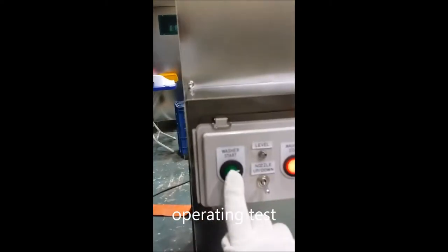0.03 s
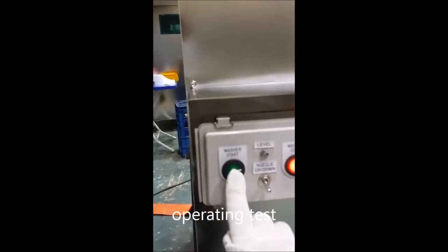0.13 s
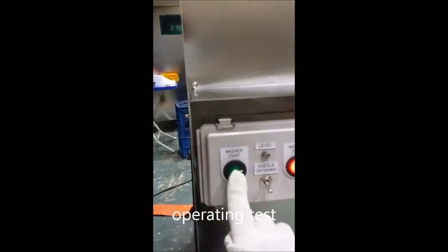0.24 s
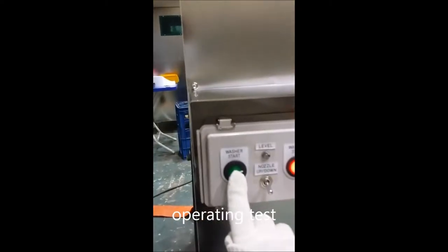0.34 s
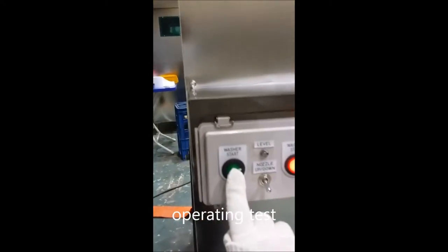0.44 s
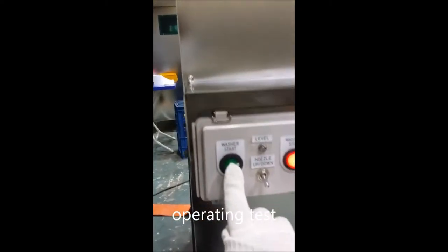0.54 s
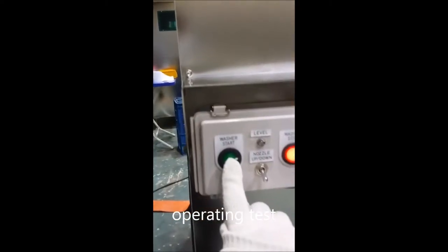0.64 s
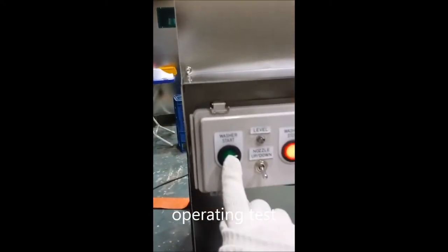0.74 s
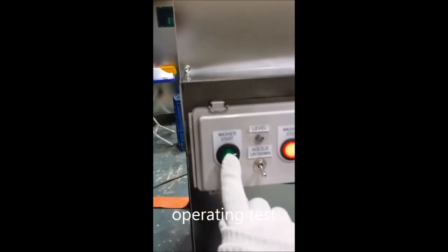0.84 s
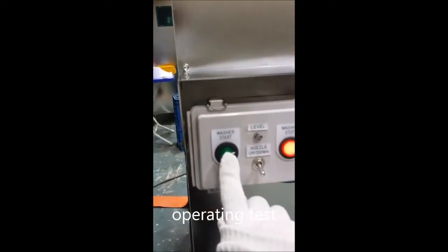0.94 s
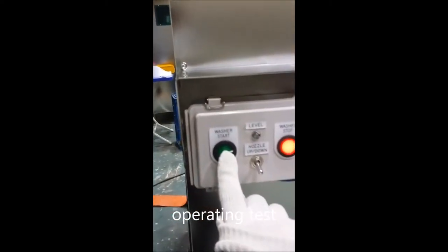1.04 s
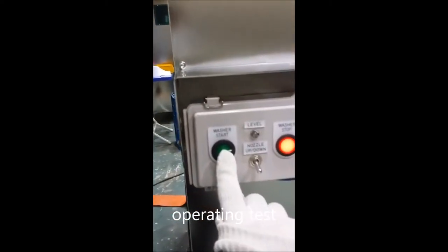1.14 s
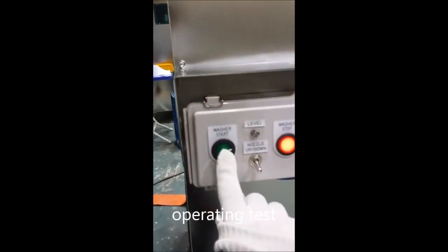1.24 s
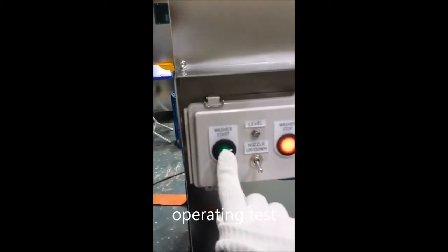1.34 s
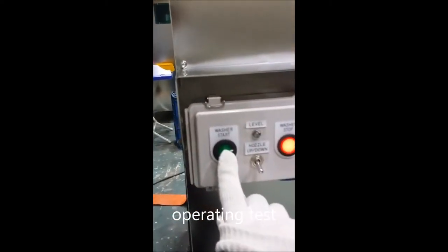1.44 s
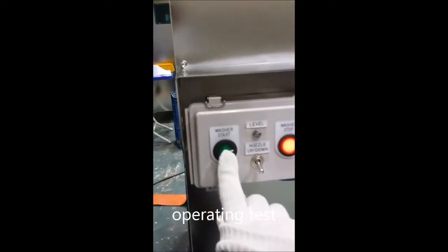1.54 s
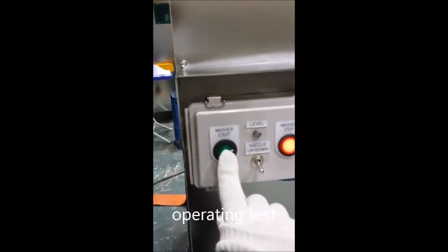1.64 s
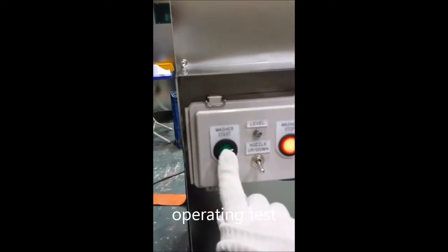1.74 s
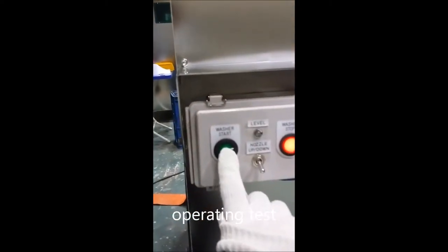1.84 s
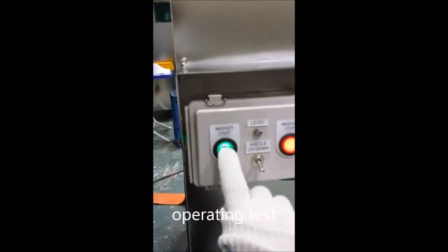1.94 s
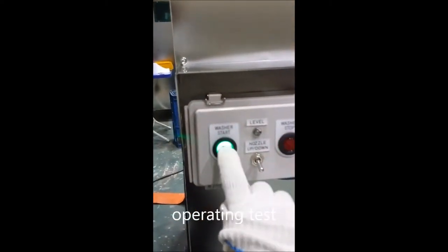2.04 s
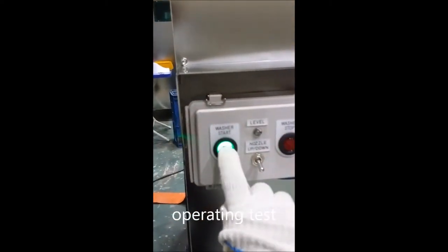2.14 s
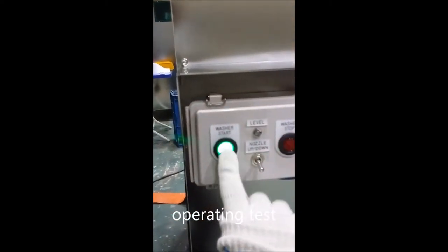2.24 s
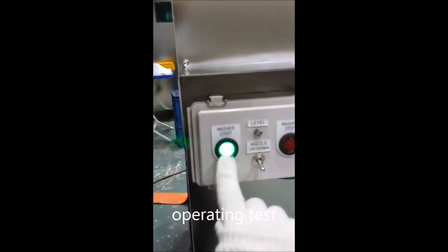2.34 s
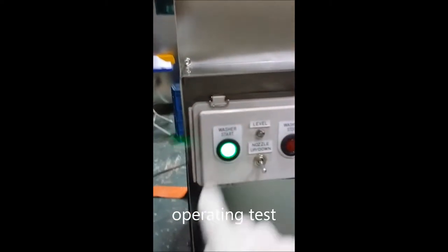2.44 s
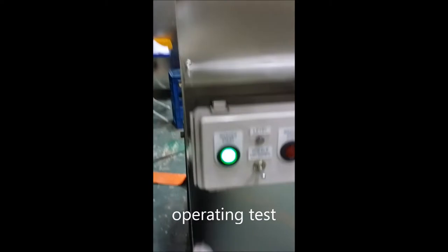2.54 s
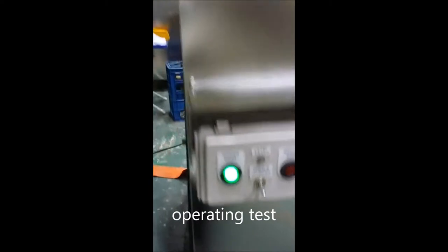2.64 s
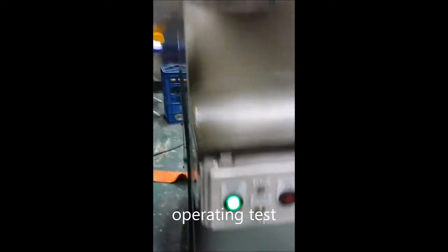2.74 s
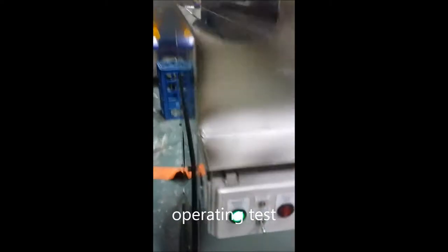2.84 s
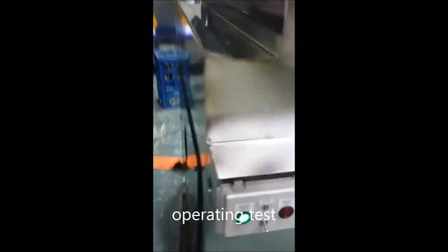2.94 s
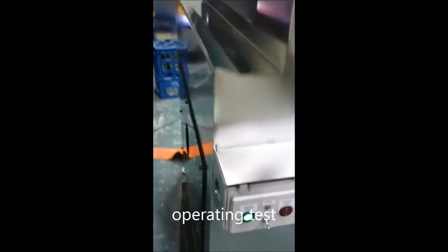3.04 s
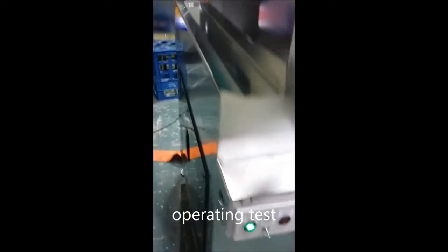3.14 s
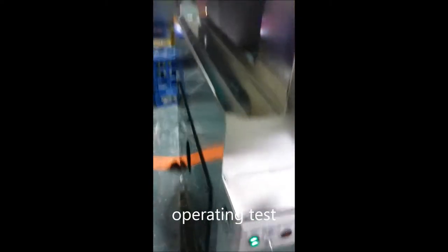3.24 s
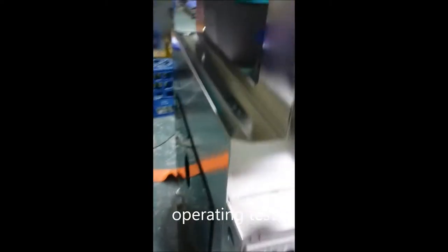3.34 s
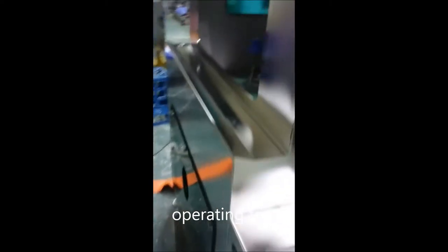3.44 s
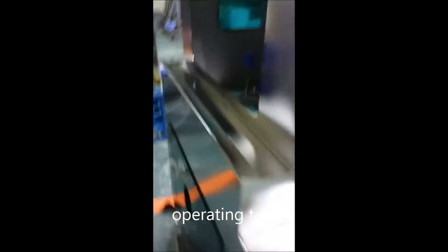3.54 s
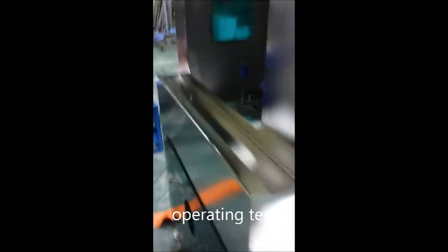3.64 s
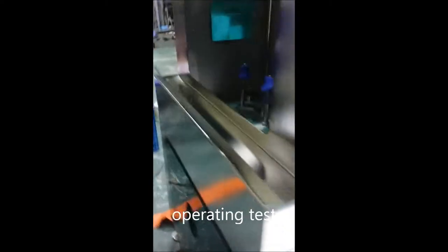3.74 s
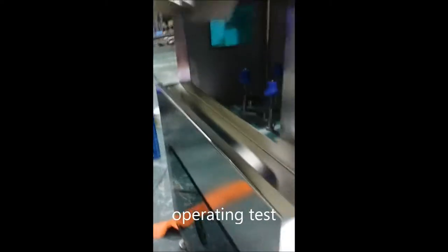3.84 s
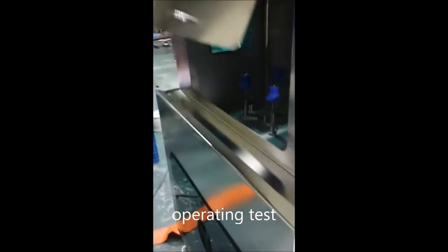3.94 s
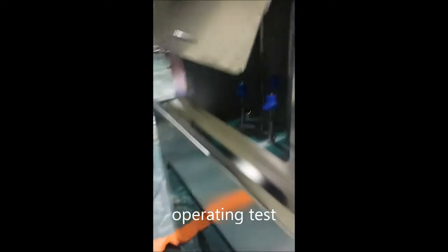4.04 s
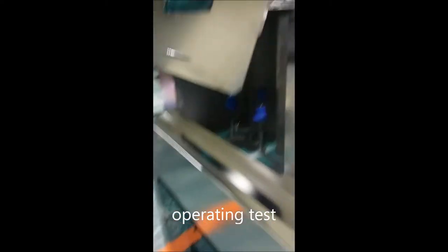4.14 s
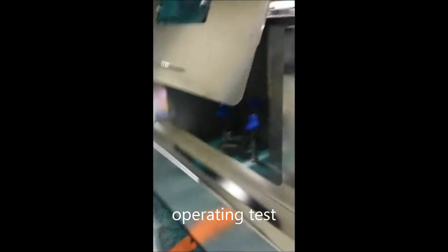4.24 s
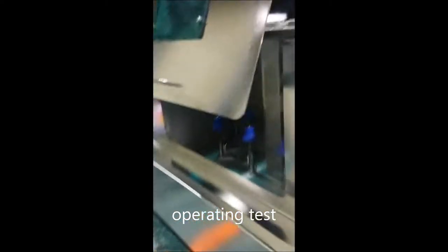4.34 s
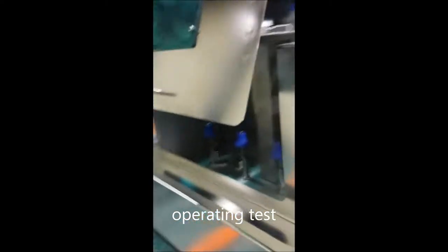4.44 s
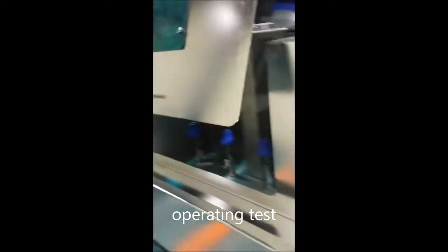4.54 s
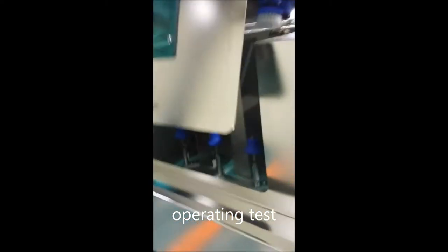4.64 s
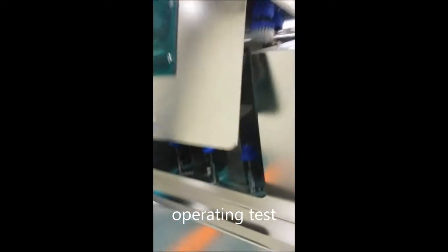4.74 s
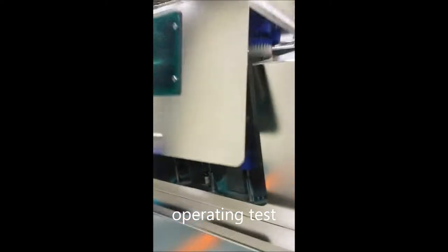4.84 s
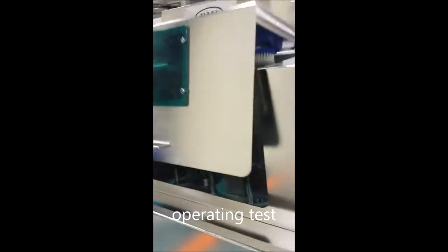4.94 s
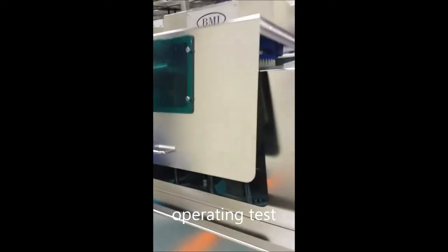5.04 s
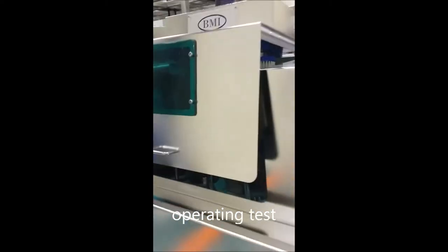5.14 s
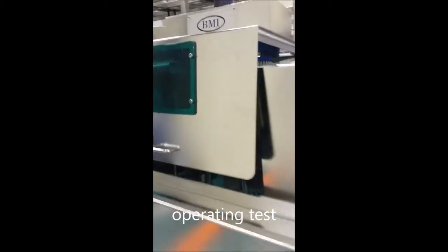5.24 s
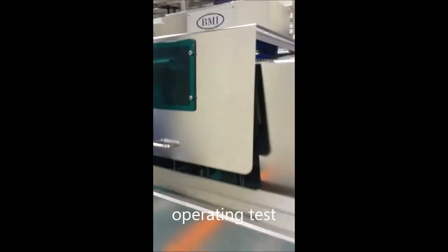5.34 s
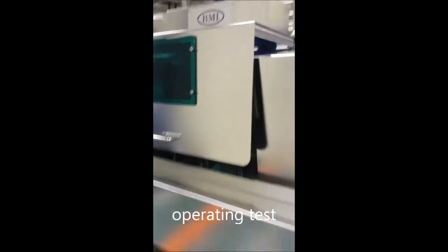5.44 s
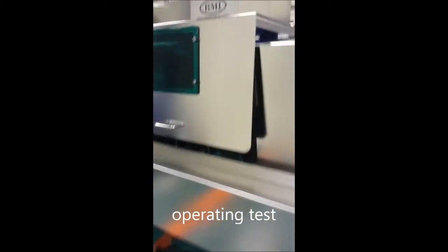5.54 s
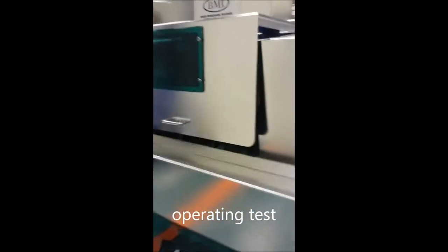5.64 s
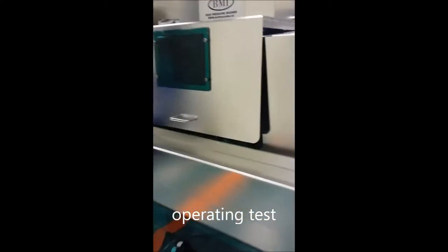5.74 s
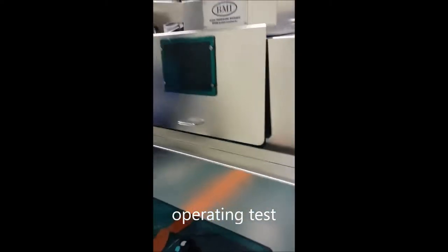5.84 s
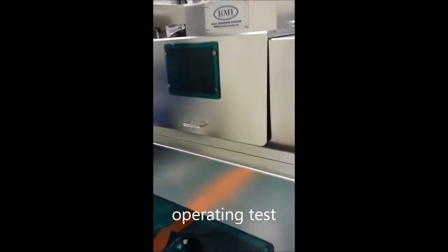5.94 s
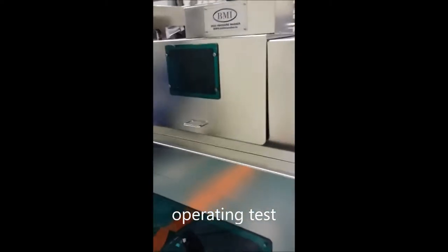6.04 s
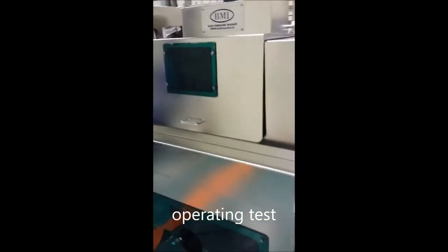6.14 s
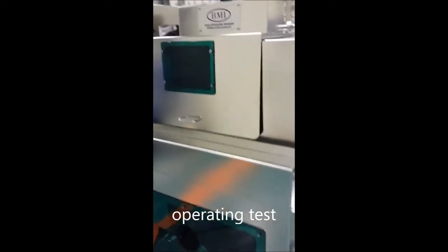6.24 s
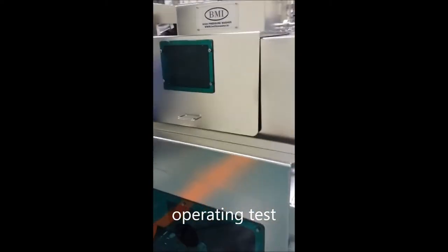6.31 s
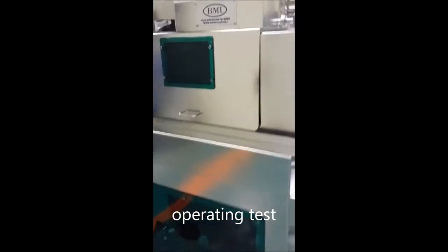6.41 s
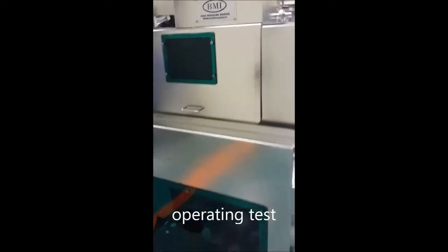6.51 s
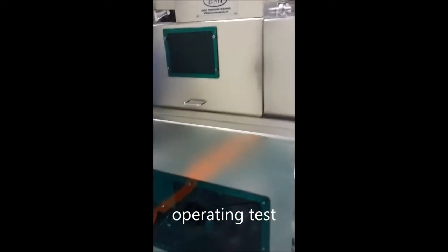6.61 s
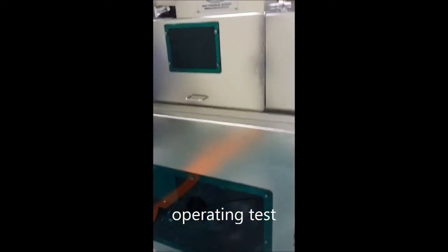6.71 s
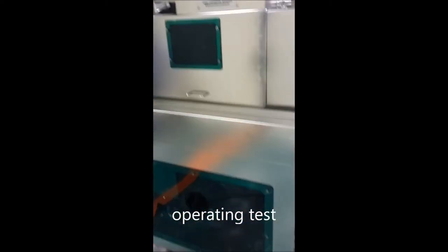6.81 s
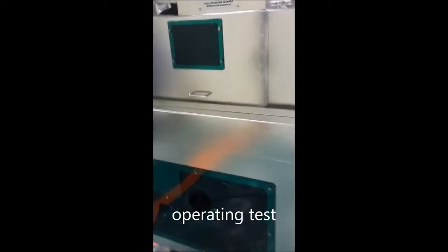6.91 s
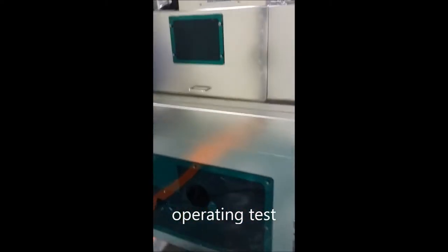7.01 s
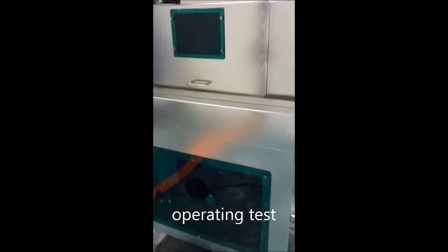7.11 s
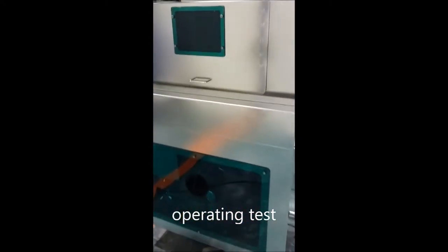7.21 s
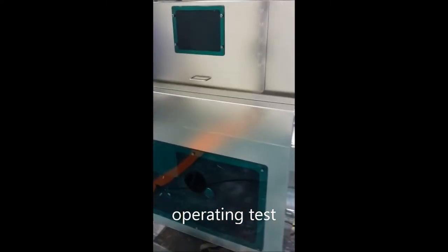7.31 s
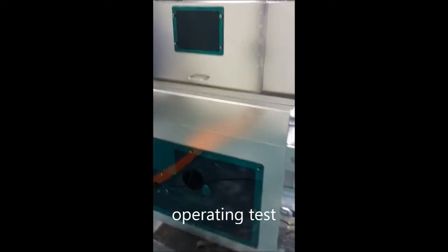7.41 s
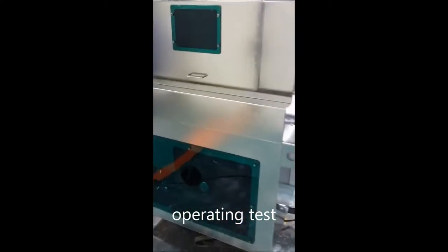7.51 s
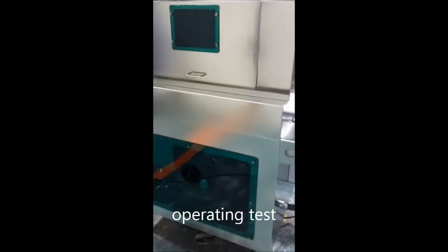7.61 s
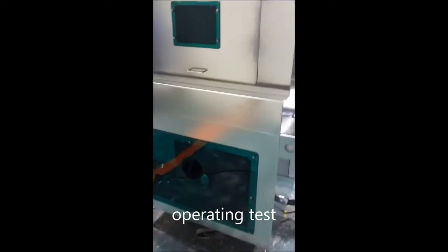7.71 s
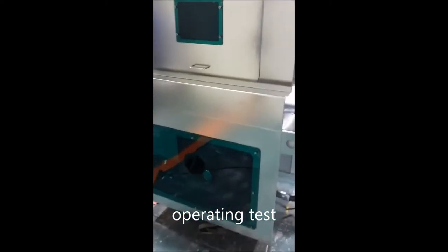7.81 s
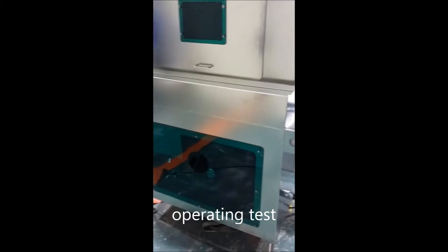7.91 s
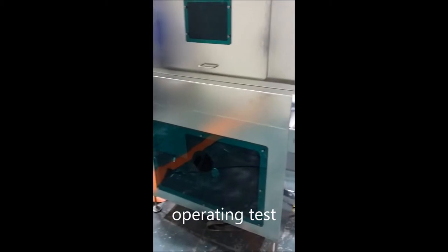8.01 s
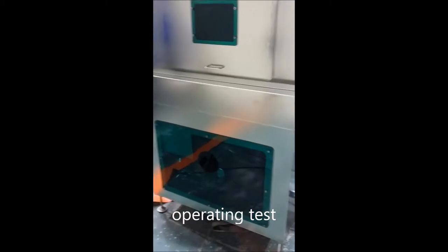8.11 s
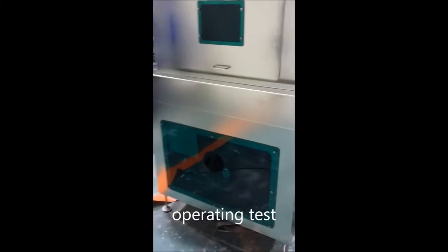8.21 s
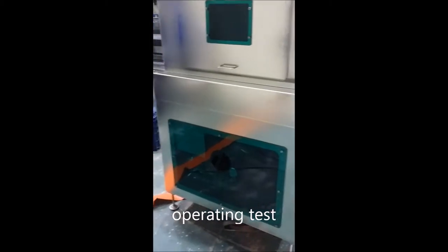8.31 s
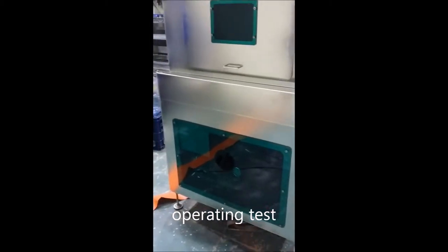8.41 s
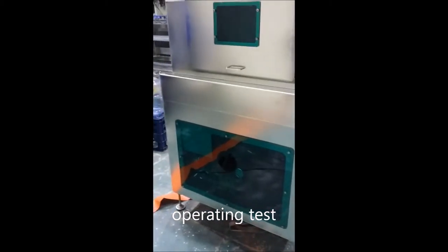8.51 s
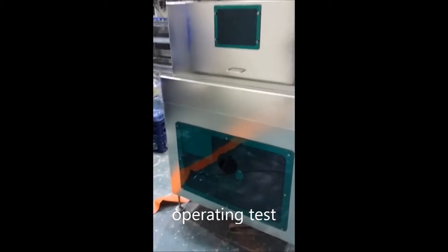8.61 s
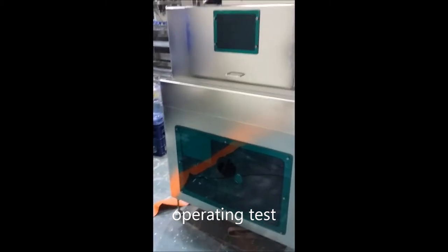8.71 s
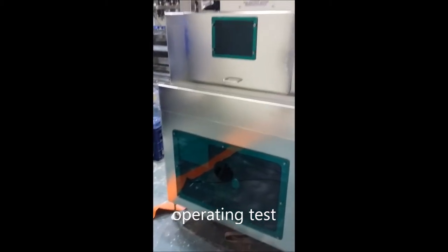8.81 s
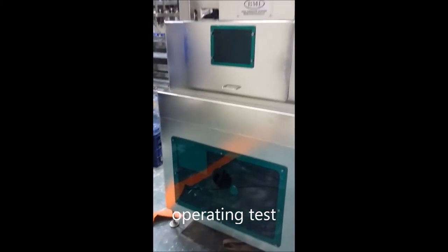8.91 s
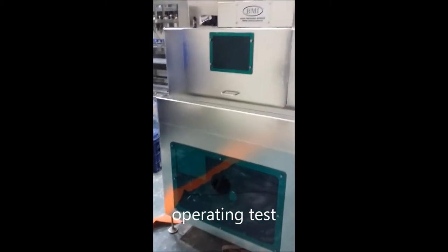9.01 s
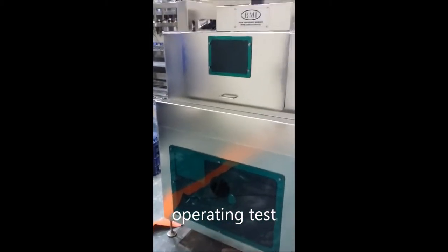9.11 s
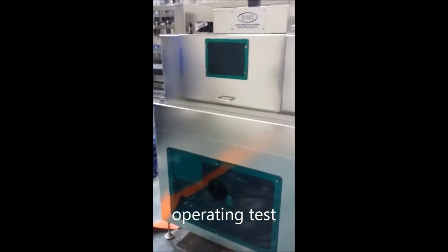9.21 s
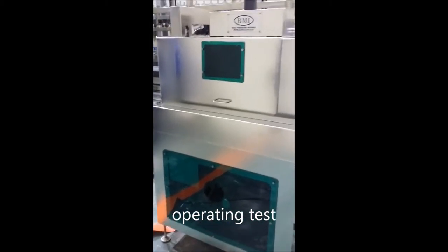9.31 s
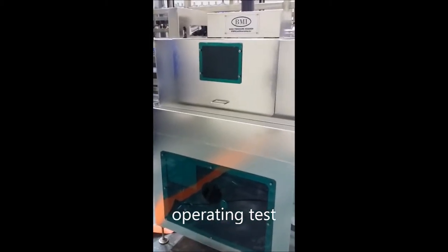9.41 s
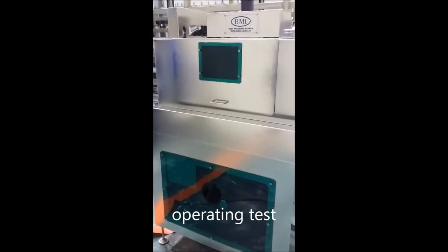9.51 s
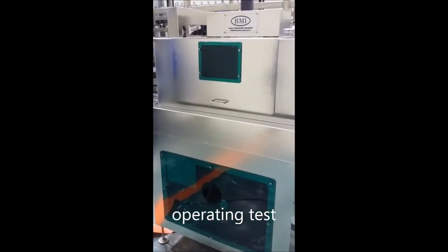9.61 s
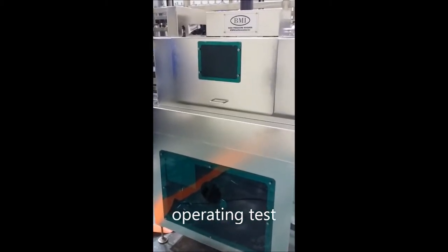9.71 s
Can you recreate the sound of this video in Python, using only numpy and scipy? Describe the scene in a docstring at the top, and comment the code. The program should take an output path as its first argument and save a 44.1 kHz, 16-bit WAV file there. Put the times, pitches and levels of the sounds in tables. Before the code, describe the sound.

A stereo microphone pair stands at a machine panel in a reverberant factory hall. For the first two seconds there is only a steady low-mid electrical hum, around 250 Hz, with faint whines and soft bass-heavy room noise. At 2.0 a button clicks and a valve dumps air: a sharp hissing burst, shuddering rumble, ringing steel and a hall tail. The button releases at about 2.25. A narrow, bright air hiss continues, fading slightly from 4.4, while a hatch slides hollowly, rubbing near 3.4, 3.8 and 4.6, with dull knocks at 2.6, 5.25 and 6.1. Hum overtones swell and fade with movement. At 6.9 a double valve bang rings the panels and thumps the pipe; the air leak stops. Water jets surge, then settle into a loud, echoing hiss inside steel, with brief thin whistles near 7.4 and 8.9, a gently fading pump tone and stronger hum until 9.76.

```python
"""Factory hall, a stereo pair of microphones walking slowly back from the panel of a bottle washer.
Magnetic hum, a sum of sines, swells and fades in the standing waves over the filtered noise of the hall.
A button clicks, a valve dumps air in noise bursts, and the door cylinder hisses as the hatch slides down.
A second valve bangs open, steel panels and pipe ring as damped sines, the pump sings in steady tones
and water jets hiss, as resonant noise with close echoes, inside the steel cabinet."""
import sys
import numpy as np
from scipy import signal
from scipy.fft import rfft, irfft, next_fast_len
from scipy.io import wavfile

SR = 44100
rng = np.random.default_rng(int(sys.argv[2]) if len(sys.argv) > 2 else 0)


def to_wav(s):
    """Save 16-bit WAV."""
    ch = np.atleast_2d(s).T  # columns
    pcm = np.round(np.clip(ch, -1, 1) * 32767)  # PCM
    wavfile.write(sys.argv[1], SR, pcm.astype(np.int16))


N = 430416

# Levels of all but the hum and whines are set ahead of the microphone ports; a COLOUR is relative.
# Hum along the walk: [t/s, fundamental level/dB, left-right level/dB]
HUM = [(0, -37.5, -5), (2.7, -37.5, -5), (3.3, -39.5, -1), (4.8, -41, -2.5), (5.7, -42.5, 1.5),
       (6.3, -43, 2), (6.7, -37, -1), (7.5, -34, -2.5), (9.76, -33, -2.5)]
HUM_HZ = 250.33
# Hum overtones: [multiple, level/dB, extra level/dB at the hatch, left-right level/dB,
# reflections against the direct wave]
HUM_OVERTONES = [(2, -64.5, 2, -4, .6), (3, -62.5, 8, -6.5, 0.51), (5, -64, 2, -9.5, .55)]
# Position: at the panel, then turning to the hatch and stepping slowly back
WALK_START_S, TURN_S, LEAVE_HATCH_S = 2.81, 0.44, 6.9
WALK_M_PER_S, SWAY_M = 0.358, 0.027
SOUND_M_PER_S = 343
# Strong crests of the standing waves met on the walk: [t/s, multiple of the hum, lift level/dB]
CRESTS = [(3.1, 2, 12.5), (3.15, 3, 4), (4.0, 5, 6.5), (5.3, 5, 8.5), (6.3, 5, 5), (6.5, 2, 9)]
CREST_WIDTH_S = 0.17
# Weaker steady tones of the electrics: [f/Hz, mean level/dB between the ears]
WHINES = [(100, -60), (118, -56.5), (850.6, -63.5), (1001.3, -66), (1502, -68)]
# Noise of the hall: [f/Hz, density level/dB]
HALL_COLOUR = [(20, -30), (45, -19), (62, -13), (76, -10.5), (105, -8.5), (200, -12), (330, -14),
               (650, -19.5), (900, -24), (1600, -20), (2150, -24.5), (4500, -28.5), (7500, -28),
               (15000, -36)]
HALL_DB = -43.5
# Start button pressed and let go: [t/s, level/dB, t60/s]
CLICKS = [(1.9865, -26, 0.048), (2.245, -23.5, 0.051)]
# Click spectrum: [f/Hz, density level/dB]
CLICK_COLOUR = [(400, -8), (920, 4), (2400, -8), (3900, 9), (6000, -2), (10000, -8), (15000, -16)]
# Valve blasts: [t/s, hiss level/dB, hiss rise/s, hiss t60/s, rumble level/dB, hall tail level/dB]
BLASTS = [(1.997, -14, 0.02, 0.33, -29.5, -28), (6.887, -15, 0.011, 0.31, -30, -26),
          (6.952, -17, .006, 0.1, -26.5, -34)]
FIRST_VALVE_S, SECOND_VALVE_S = BLASTS[0][0], BLASTS[1][0]
# Blast hiss: [f/Hz, density level/dB]
BLAST_COLOUR = [(300, -4.5), (900, -3.5), (1600, -6), (2600, -9.5), (3700, 0), (6000, 0), (8700, -2.5),
                (11000, -5.5), (15000, -9.5)]
# Blast rumble: [f/Hz, density level/dB]
RUMBLE_COLOUR = [(25, -36), (50, -16), (85, -2), (220, 5), (400, -1.5), (800, -8), (1600, -11.5),
                 (3000, -26)]
HALL_T60_S = 1.32
# Air leaving the door cylinder holds its level, then fades
BLEED_DB, BLEED_HOLD_S, BLEED_FADE_DB_PER_S = -38.5, 2.37, 1.5
# Its throttle: [f/Hz, density level/dB]
BLEED_COLOUR = [(300, -11), (900, -6), (2000, -9.5), (4000, -9.5), (6200, -12), (7500, 1), (9200, -2.5),
                (10000, -13.5), (12000, -21.5), (15000, -36)]
# Resonances of the throttle: [f/Hz, width/Hz, level/dB]
BLEED_PEAKS = [(2520, 150, 7), (3545, 220, 10), (4634, 190, 10.5), (5440, 420, 15), (6980, 380, 7.5)]
# Passing the throttle's mouth, where its treble is beamed: [t/s, width/s, level/dB]
BEAM = (2.92, 0.38, -48)
# The hatch rubbing in its guides: [t/s, level/dB, t60/s]
RUBS = [(3.35, -45, 1), (3.8, -38, 1.2), (4.62, -48, .8)]
# Rubbing spectrum: [f/Hz, density level/dB]
RUB_COLOUR = [(50, -23), (125, 7), (200, -4), (500, -13), (900, -13), (1700, -11), (2600, -15), (8000, -13),
              (15000, -30)]
# Jolts that ring the cabinet panels: [t/s, level/dB]
JOLTS = [(2.006, -26.5), (2.046, -26.5), (6.952, -24)]
# Modes of the panels: [f/Hz, level/dB against the jolt, t60/s]
PANELS = [(100, -11, 0.84), (215.5, -18, 0.95), (292.6, 0, 0.76), (449, -17, 1), (547, -14.5, 0.92),
          (681, -15, 0.31)]
# Water hammer in the supply pipe: [t/s, f/Hz, level/dB, t60/s]
HAMMER = [(6.897, 167.5, -23, 0.36), (6.96, 150, -24, 0.19), (7.035, 123.3, -29, .3)]
# Dull knocks: [t/s, level/dB, t60/s]
KNOCKS = [(2.63, -46, .1), (5.25, -36, 0.13), (6.11, -41, 0.084)]
# Knock spectrum: [f/Hz, density level/dB]
KNOCK_COLOUR = [(60, -23), (200, -3), (390, 5), (600, -24), (1700, -12), (4000, -40)]
# Pump tones: [multiple of the vane rate, level/dB before the fade]
PUMP = [(.525, -49), (1, -47), (3, -59), (9, -53)]
VANE_HZ, PUMP_FADE_DB_PER_S = 297.9, 4
# Water jets open with a surge that decays, with this time constant, to a steady level
JET_DB, SURGE_DB, SETTLE_S = -30.5, 6, 0.55
# Hiss of the jets: [f/Hz, density level/dB]
JET_COLOUR = [(30, -26), (150, -3.5), (400, -5), (900, -9), (1900, -3.5), (2600, -1.5), (4000, 0),
              (5800, -2), (8700, 0.5), (9700, -7.5), (10600, -22.5), (12800, -24), (13600, -5),
              (14400, -18), (15200, -41)]
# Resonances of the nozzles: [f/Hz, width/Hz, level/dB]
JET_PEAKS = [(1400, 210, 6.5), (2530, 160, 4), (4565, 114, 6), (4730, 100, 6), (4940, 150, 4.5),
             (5230, 110, 5), (6540, 120, 4), (6900, 140, 5.5)]
# A jet whistling briefly: [t/s, f/Hz, peak level/dB, t60/s]
WHISTLES = [(7.37, 4780, -32, .35), (8.86, 4880, -31, .25)]
# Likeness of the noise at the two microphones, limited to -1..1: [f/Hz, left-right correlation]
LIKENESS = [(60, 1.1), (130, 0.8), (290, 1), (640, 0.17), (1400, -0.12), (3000, 0)]
# Difference in colour of the two microphone ports: [f/Hz, left-right level/dB]
PORTS = [(100, -2.5), (700, -2), (1500, -6.5), (2200, -1), (4200, -0.5), (6200, 7.5), (6900, 9), (7600, -4),
         (8700, -6), (10500, -2.5), (13500, 1.5)]
CUTOFF_HZ = 15400
EARS = np.array([[1], [-1]])  # left, right
T = np.arange(N) / SR
SIZE = next_fast_len(N, real=True)
HZ = np.maximum(np.fft.rfftfreq(SIZE, 1 / SR), 1)


def from_db(db):
    """Decibels to gain."""
    return 10 ** (np.asarray(db) / 20)


def rms_one(x):
    """Scale to unit power."""
    return x / np.sqrt(np.mean(x ** 2) + 1e-20)


def in_time(rows):
    """Each column of a curve at every sample."""
    s, *columns = np.transpose(rows)
    return [np.interp(T, s, column) for column in columns]


def over_hz(points):
    """A table joined by straight lines on a log-frequency axis."""
    hz, value = np.transpose(points)
    return np.interp(np.log(HZ), np.log(hz), value)


def filtered(x, gain):
    """Apply a gain for each frequency."""
    return irfft(rfft(x, SIZE) * gain, SIZE)[..., :N]


def drift(rate):
    """Slow random wandering of rms 1, low-passed around a rate in Hz."""
    size = 2 ** 14
    hz = np.fft.rfftfreq(size, T[-1] / size)
    slow = irfft(rfft(rng.standard_normal(size)) / (1 + (hz / rate) ** 2))
    return np.interp(T, np.linspace(0, T[-1], size), rms_one(slow))


def noise(colour, peaks=(), echoes=1):
    """Stereo turbulence with a broad colour, resonances and an echo pattern; rms 1."""
    level_db = over_hz(colour)
    for hz, width, peak_db in peaks:
        extra_power = from_db(peak_db) ** 2 - 1
        resonance = 1 + extra_power / (1 + (2 * (HZ - hz) / width) ** 2)
        level_db = level_db + 10 * np.log10(resonance)
    mid, side = rfft(rng.standard_normal((2, SIZE)))
    alike = np.clip(over_hz(LIKENESS), -1, 1)
    pair = np.sqrt(1 + alike) * mid + np.sqrt(1 - alike) * side * EARS
    return rms_one(irfft(pair * from_db(level_db) * echoes, SIZE)[:, :N])


def steel_echoes(share, longest_s, count=24):
    """Direct sound plus reflections off flat steel: a fine comb, different at each ear."""
    reflections = np.zeros((2, SIZE))
    for ear in reflections:
        delay_s = rng.uniform(.002, max(longest_s, .003), count)
        ear[(delay_s * SR).astype(int)] = rng.choice([-1, 1], count)
    return 1 + share * rfft(reflections) / np.sqrt(count)


def walked_past(colour, peaks, share, longest_s, count=3):
    """A hiss whose echo pattern turns slowly into others and comes round every 4 s."""
    weights = [np.maximum(np.cos(2 * np.pi * (T / 4 - k / count)), 0) for k in range(count)]
    hiss = sum(w * noise(colour, peaks, steel_echoes(share, longest_s)) for w in weights)
    return hiss / np.sqrt(sum(w ** 2 for w in weights))


def opened(start, rise):
    """Flow through a valve that opens in a straight rise and stays open."""
    return np.clip((T - start) / rise, 0, 1)


def swell(start, rise, t60):
    """A straight rise, then an exponential fall."""
    return opened(start, rise) * from_db(-60 * np.maximum(T - start - rise, 0) / t60)


def passing(s, width):
    """A bell-shaped rise and fall as the listener passes a spot."""
    return np.exp(-((T - s) / width) ** 2)


def tone(hz, waver):
    """A sine of rms 1 whose phase wanders slowly by waver radians rms."""
    return np.sqrt(2) * np.sin(2 * np.pi * (hz * T + rng.random()) + waver * drift(1.4))


def taps(rows, colour, rise):
    """Contacts that set many close modes ringing, as bursts of coloured noise."""
    envelope = sum(from_db(db) * swell(s, rise, t60) for s, db, t60 in rows)
    return envelope * noise(colour)


def struck(s, hz, db, t60, rise):
    """One damped mode, its phase made unsteady by loose fittings; the level is rms after the rise."""
    phase = 2 * np.pi * hz * (T - s) + 0.7 * drift(18)
    return from_db(db) * swell(s, rise, t60) * np.sqrt(2) * np.sin(phase)


def standing_waves(hz, walked_m, reflected, count=6):
    """A tone of rms 1 in a field of direct and reflected waves whose phases turn with distance walked."""
    heading, start = rng.random((2, count, 2, 1))
    coarse_m = walked_m[::200]  # the field changes slowly
    turns = start + np.cos(np.pi * heading) * coarse_m * hz / SOUND_M_PER_S
    field = 1 + reflected * np.exp(2j * np.pi * turns).sum(axis=0) / np.sqrt(count)
    field = np.array([np.interp(T, np.linspace(0, T[-1], len(port)), port) for port in field])
    return rms_one(np.real(field * np.exp(2j * np.pi * (hz * T + rng.random()))))


def hum():
    """Magnetic hum; overtones grow at the hatch and rise and fall with the hall's standing waves."""
    first_db, pan_db = in_time(HUM)
    phase = 2 * np.pi * HUM_HZ * T + .03 * drift(4) + 0.15 * EARS
    fundamental = from_db(first_db + EARS * pan_db / 2) * np.sqrt(2) * np.sin(phase)
    walked_m = WALK_M_PER_S * np.maximum(T - WALK_START_S, 0) + SWAY_M * drift(1.5)
    at_hatch = opened(WALK_START_S, TURN_S) * (1 - opened(LEAVE_HATCH_S, TURN_S))
    overtones = 0
    for multiple, db, hatch_db, overtone_pan_db, reflected in HUM_OVERTONES:
        crest_db = sum(lift_db * passing(s, CREST_WIDTH_S) for s, k, lift_db in CRESTS if k == multiple)
        level_db = db + hatch_db * at_hatch + crest_db + EARS * overtone_pan_db / 2
        overtones += from_db(level_db) * standing_waves(multiple * HUM_HZ, walked_m, reflected)
    return fundamental + overtones


def whines():
    """Steady tones of the electrics, wandering in level and 3 dB stronger on the right."""
    tones = sum(from_db(db + 1.5 * drift(1.3)) * tone(hz, waver=0.26) for hz, db in WHINES)
    return tones * from_db(-1.5 * EARS)


def hall():
    """Steady broadband noise of the hall, strongest in the bass, its level wandering a little."""
    return from_db(HALL_DB + .5 * drift(11.0)) * noise(HALL_COLOUR)


def start_button():
    """Short contact clicks as the button is pressed and let go."""
    return taps(CLICKS, CLICK_COLOUR, rise=.001)


def blasts():
    """Each valve dumps its pressure: a sharp hiss, a shuddering rumble and a coloured tail from the hall."""
    hiss_power = rumble_power = tail_power = 0
    for start, hiss_db, rise, t60, rumble_db, tail_db in BLASTS:
        hiss_power += (from_db(hiss_db) * swell(start, rise, t60)) ** 2
        rumble_power += (from_db(rumble_db) * swell(start, 0.019, t60=1.43)) ** 2
        tail_power += (from_db(tail_db) * swell(start, 0.062, HALL_T60_S)) ** 2
    tail = noise([(300, 6), (1000, -16.0), (1600, 8.5), (2600, 1), (4500, 3.5), (8000, 0), (15000, -36)])
    rumble = noise(RUMBLE_COLOUR) * from_db(2.0 * drift(22))
    echoes = steel_echoes(share=0.65, longest_s=.006)
    hiss = noise(BLAST_COLOUR, echoes=echoes) * from_db(0.68 * drift(90))
    return np.sqrt(hiss_power) * hiss + np.sqrt(rumble_power) * rumble + np.sqrt(tail_power) * tail


def door_cylinder():
    """Air bleeds through a throttle, slowly fading, from the first valve until the second one switches."""
    fading_s = np.maximum(T - FIRST_VALVE_S - BLEED_HOLD_S, 0)
    level_db = BLEED_DB - BLEED_FADE_DB_PER_S * fading_s + 0.5 * drift(14.0)
    flow = opened(FIRST_VALVE_S, 0.087) * (1 - opened(SECOND_VALVE_S, .1))
    hiss = walked_past(BLEED_COLOUR, BLEED_PEAKS, share=0.67, longest_s=.012)
    passing_s, width_s, beam_db = BEAM
    treble = noise([(3000, -30), (7000, -2), (11000, 0), (15000, -2)])
    beam = from_db(beam_db) * passing(passing_s, width_s) * treble
    return flow * from_db(level_db) * hiss + beam


def hatch():
    """The hatch sets off with a hollow sliding noise and rubs here and there on its way down."""
    hollow = noise([(100, -9), (500, -1), (1000, -2), (1600, 8.0), (2400, -5), (6000, -24)])
    sliding = from_db(-44.0) * swell(FIRST_VALVE_S, 0.082, t60=7.4) * hollow
    return sliding + taps(RUBS, RUB_COLOUR, rise=0.081)


def cabinet():
    """Jolts ring the damped modes of the steel panels."""
    return sum(struck(s, hz, db + mode_db, t60, rise=0.0044)
               for s, db in JOLTS for hz, mode_db, t60 in PANELS)


def knocks():
    """Dull knocks as short bursts of low-coloured noise."""
    return taps(KNOCKS, KNOCK_COLOUR, rise=0.0037)


def jets():
    """Water jets hiss between the cabinet's walls; they surge at first, then settle."""
    surge = np.exp(-np.maximum(T - SECOND_VALVE_S, 0) / SETTLE_S)
    level_db = JET_DB + SURGE_DB * surge + 0.63 * drift(22)
    hiss = walked_past(JET_COLOUR, JET_PEAKS, share=1.12, longest_s=.025)
    # air left in the nozzles adds a bright hiss that dies away
    bright = noise([(4000, -25), (7000, 11), (11000, -4), (14000, -1), (15500, -8)])
    spit = from_db(-34.5) * swell(SECOND_VALVE_S, 0.14, t60=5.9) * bright
    whistles = 0
    for s, hz, db, t60 in WHISTLES:
        phase = 2 * np.pi * hz * T + .5 * drift(50)
        whistles += from_db(db) * swell(s, 0.045, t60) * np.sin(phase)
    return opened(SECOND_VALVE_S, 0.026) * from_db(level_db) * hiss + spit + whistles


def pump():
    """The pump sings at multiples of its vane rate, starting with the second valve and slowly fading."""
    fade = from_db(-PUMP_FADE_DB_PER_S * np.maximum(T - SECOND_VALVE_S, 0))
    tones = sum(from_db(db) * tone(k * VANE_HZ, waver=0.97) for k, db in PUMP)
    return opened(SECOND_VALVE_S, 0.32) * fade * tones


def water_hammer():
    """The starting water column thumps in its pipe, as damped low modes."""
    return sum(struck(s, hz, db, t60, rise=0.012) for s, hz, db, t60 in HAMMER)


def scene():
    """All but the hum and whines passes two differently coloured microphone ports."""
    air = hall() + start_button() + blasts() + door_cylinder() + hatch()
    air = air + cabinet() + knocks() + jets() + pump() + water_hammer()
    ports = from_db(over_hz(PORTS) / 2 * EARS)
    return filtered(air, ports) + hum() + whines()


def record(dry):
    """The top is cut steeply by an elliptic low-pass."""
    steep_cut = signal.ellip(10, .2, 90, CUTOFF_HZ, fs=SR, output="sos")
    return signal.sosfilt(steep_cut, dry)


dry = scene()
out = record(dry)
to_wav(out)
```